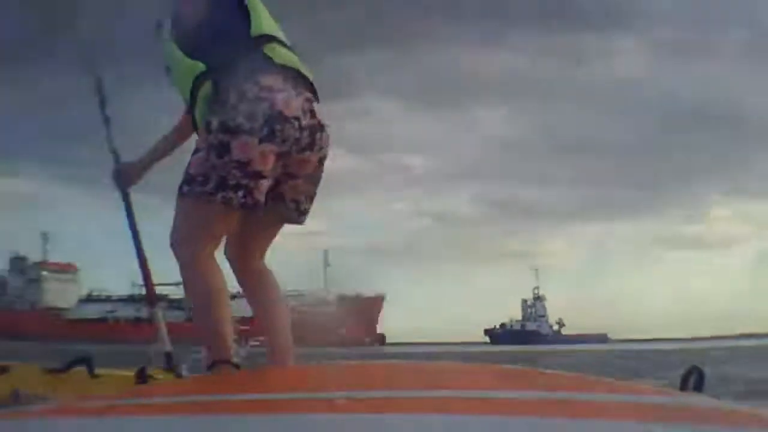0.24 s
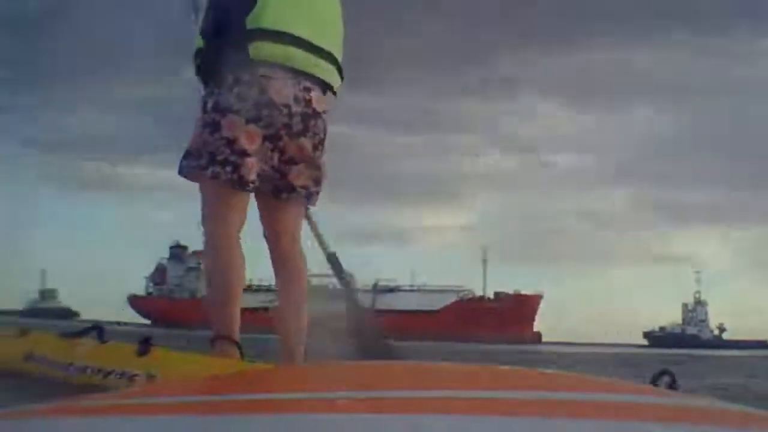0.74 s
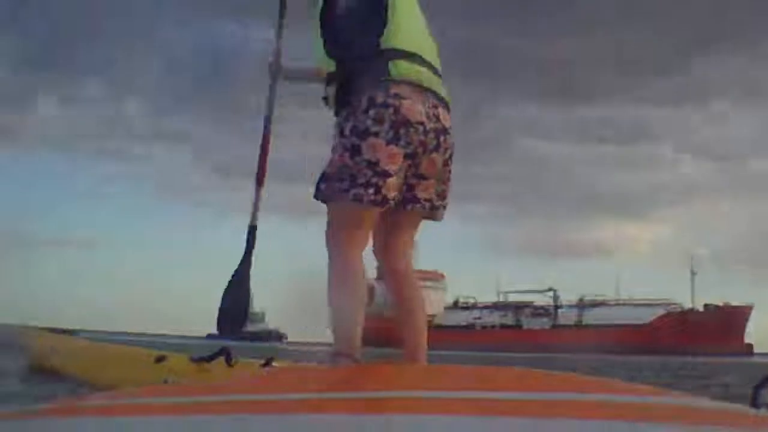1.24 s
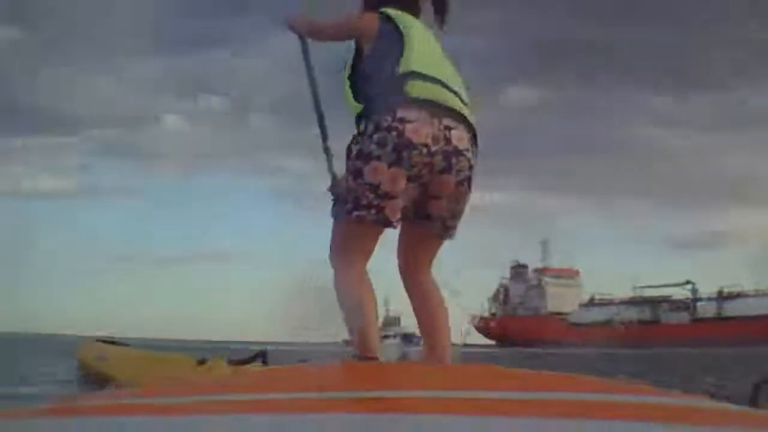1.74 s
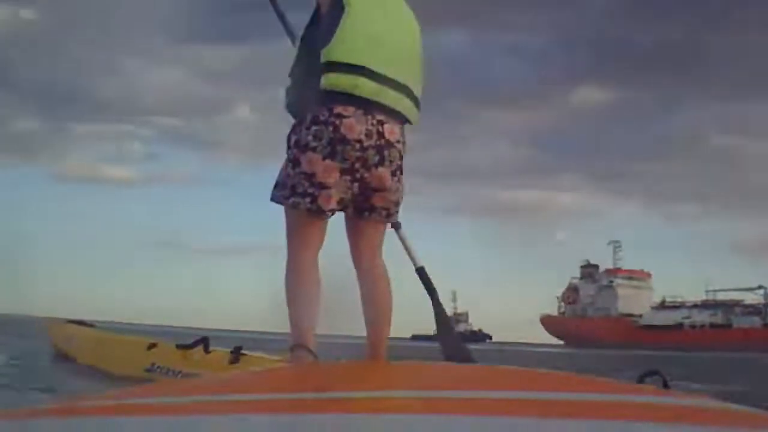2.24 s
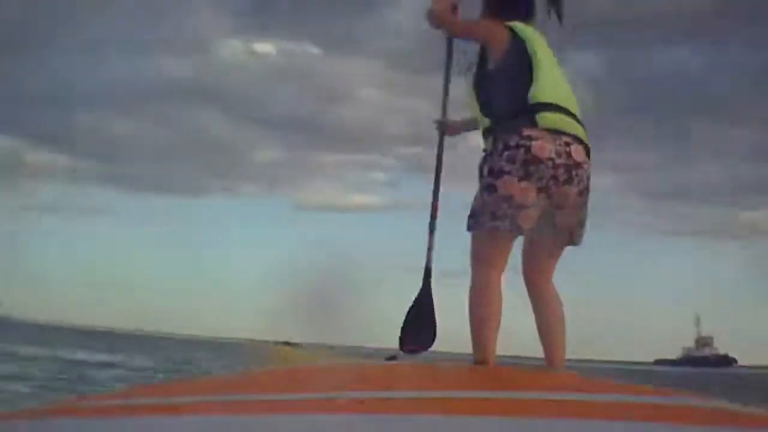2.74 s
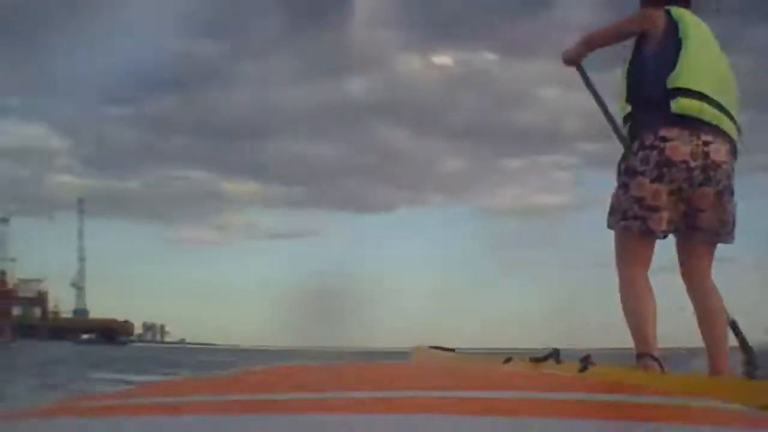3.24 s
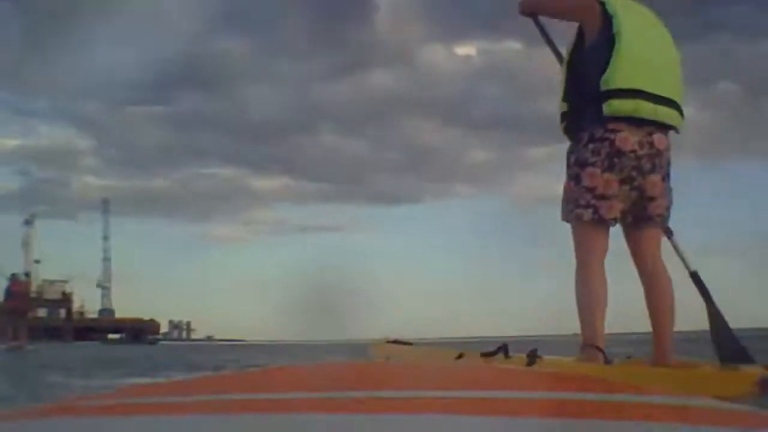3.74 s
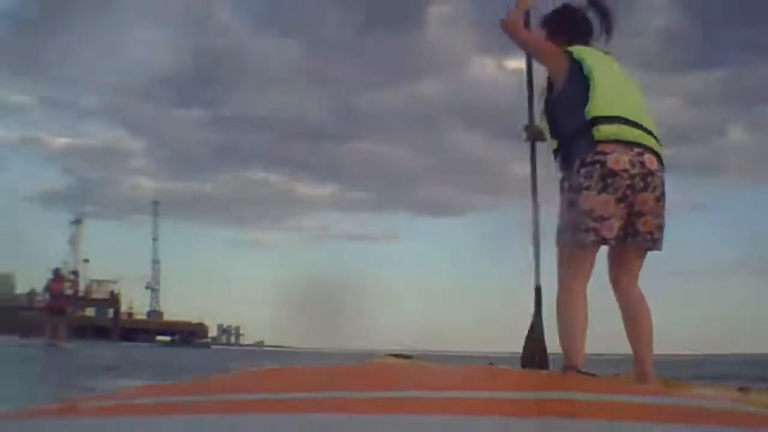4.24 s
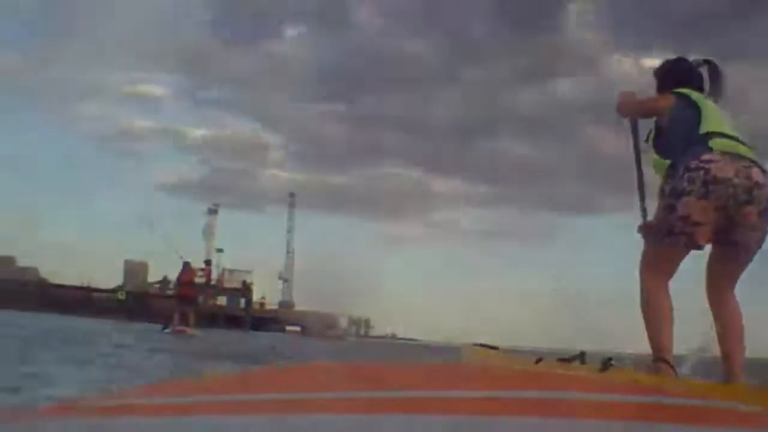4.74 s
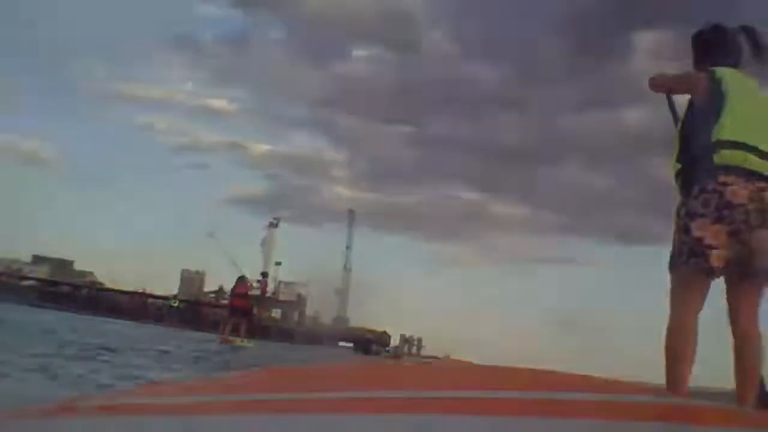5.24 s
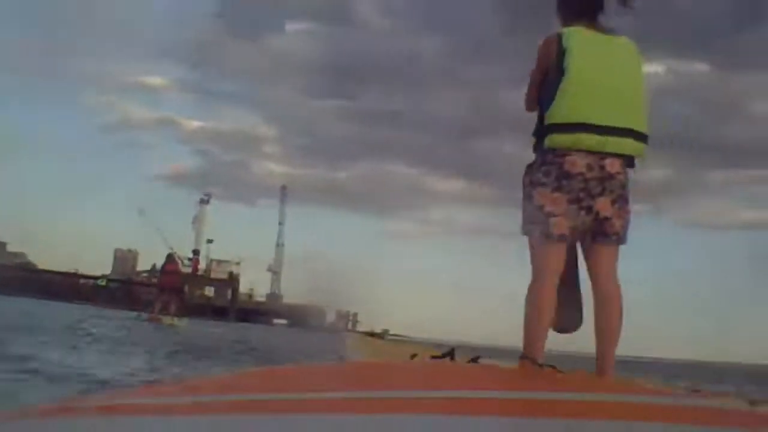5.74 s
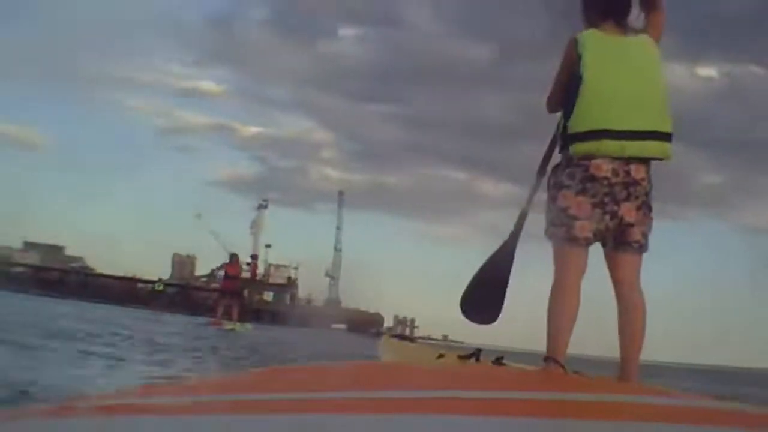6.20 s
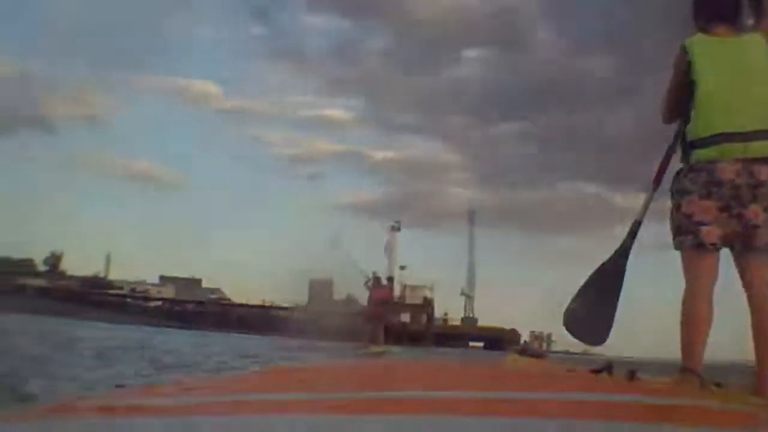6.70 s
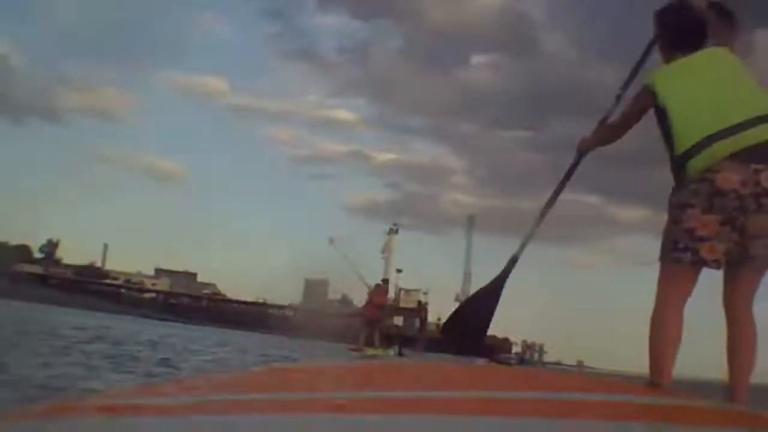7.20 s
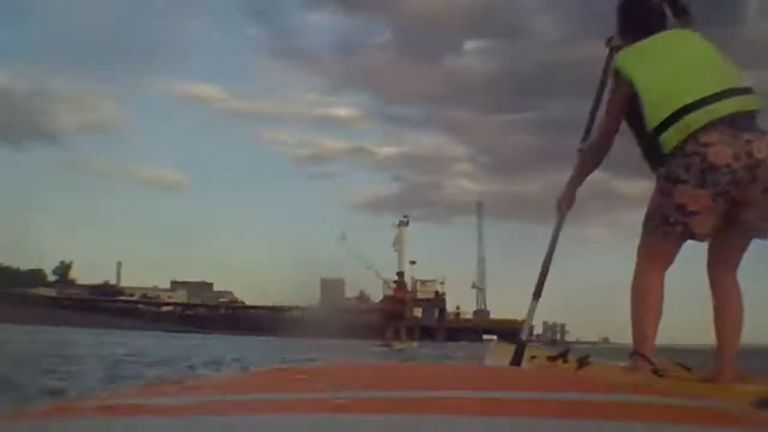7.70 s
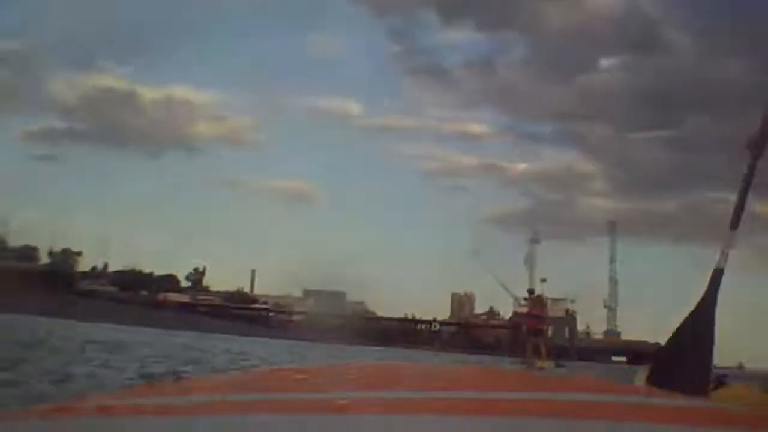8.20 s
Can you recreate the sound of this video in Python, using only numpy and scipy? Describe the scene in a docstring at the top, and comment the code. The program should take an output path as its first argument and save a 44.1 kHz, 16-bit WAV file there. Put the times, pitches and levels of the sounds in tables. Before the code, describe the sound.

A small camera in a plastic housing rides a paddleboard on open water. Wavelets slap and gurgle softly at first over a low, wavering hull rumble, with sparse plastic ticks. Knocks thicken around three and five seconds, then a heavy jolt just after six brings booms, sharp cracks and frantic rattling, overloading the microphone. Rough thumps and clatter continue to the end above faint buzz and hiss.

```python
"""Loose camera on a paddleboard in chop

A small camera in a plastic housing rides on the board, so every source is close and there is no room.
The hull booms as pitched, wavering tones; wavelets slap it as ragged pushes that ring the deck's modes.
The loose camera rattles and scrapes as ticks and slips that ring the housing; bubble tones gurgle, splash, plink.
Underneath, its own electronics buzz, hum and hiss; the microphone's band is narrow and loud jolts overload it."""
import sys
import numpy as np
from scipy import signal
from scipy.fft import rfft, irfft, next_fast_len
from scipy.io import wavfile
from scipy.ndimage import uniform_filter1d

SR = 44100
rng = np.random.default_rng(int(sys.argv[2]) if len(sys.argv) > 2 else 0)


def persist_wave(psi):
    """Save psi, clipped to +-1, as 16-bit WAV."""
    counts = np.round(np.clip(psi, -1, 1) * 32767).astype(np.int16)
    wavfile.write(sys.argv[1], SR, np.atleast_2d(counts).T)


N = 373086  # samples

# ringing modes of the plastic housing: f/Hz, relative level/dB, t60/s
HOUSING_MODES = [(1390, -26, 0.026), (1840, 2, 0.013), (2155, 0.5, 0.0096), (2996, -1, 0.011),
                 (4095, -6.5, 0.014), (4820, -0.5, 0.003), (6520, -24.5, 0.0096), (6830, -23.5, 0.0076)]
# ringing modes of the deck: f/Hz, relative level/dB, t60/s
DECK_MODES = [(90, 7.5, 0.026), (176, -3, 0.11), (238.6, -4, 0.04), (361, -3, 0.031), (450, -3, 0.026),
              (916, 5.5, 0.0058), (1260, 7, 0.014), (1860, -3, 0.019)]
USUAL_BRIGHT_DB = -16.5  # brightness at which a knock leaves the housing's modes untilted


def gain_of(db):
    """Decibels to amplitude."""
    return 10 ** (np.asarray(db) / 20)


def evened(x):
    """Scales to rms 1."""
    return x / np.sqrt(np.mean(x ** 2) + 1e-20)


def read(points, hz):
    """Reads a spectrum on a log-frequency axis."""
    f, value = np.transpose(points)
    return np.interp(np.log(hz + 1), np.log(f + 1), value)


def add(mix, s, sound):
    """Mixes a sound in at time s."""
    part = mix[round(s * SR):][:len(sound)]
    part += sound[:len(part)]


def coloured(x, spectrum):
    """Filters by a spectrum, rms 1."""
    size = next_fast_len(len(x))
    gain = gain_of(read(spectrum, np.fft.rfftfreq(size, 1 / SR)))
    return evened(irfft(rfft(x, size) * gain, size)[:len(x)])


def slow(seconds):
    """Smooth chance of rms 1 that changes over the given time."""
    size = max(int(seconds * SR), 2)
    once = uniform_filter1d(rng.standard_normal(N), size)
    return evened(uniform_filter1d(once, size))


def ring(modes, tilt, blow, detune):
    """A blow rings a table of decaying modes; tilt holds extra dB and detune a pitch factor per mode."""
    t = np.arange(round(.16 * SR)) / SR
    body = np.zeros(len(t))
    for k, ((hz, db, t60), more_db, factor) in enumerate(zip(modes, tilt, detune)):
        decay = gain_of(db + more_db - 60 * t / t60)
        body += (-1) ** k * decay * np.sin(2 * np.pi * hz * factor * t)
    return signal.fftconvolve(blow, body)


def chop(column):
    """How rough the water under the board is: one column of its table at every sample."""
    # t/s, hull flexing level/dB, water heave level/dB, gurgle level/dB
    roughness = [(0.0, -37.5, -51.5, -55.5), (0.3, -28.5, -47, -56), (0.85, -36, -56, -55.5),
                 (1.81, -25, -37, -47), (2.33, -34.5, -53, -59), (2.47, -27.5, -46, -48.5),
                 (2.61, -30, -38, -45.5), (3.53, -17, -29.5, -44), (4.24, -27.5, -40.5, -47.5),
                 (5.42, -19, -34, -41), (5.73, -23, -39, -51.5), (6.05, -30.5, -41.5, -47.5),
                 (6.13, -12.5, -40, -39), (6.22, -20.5, -26.5, -36), (6.46, -11, -44.5, -44),
                 (6.55, -25.5, -43, -43.5), (6.74, -13.5, -36, -47), (7.37, -27.5, -37, -40.5),
                 (7.49, -11, -22.5, -48), (7.82, -25, -47.5, -52), (8.22, -15.5, -33, -41),
                 (8.46, -18, -45, -45.5)]
    rows = np.transpose(roughness)
    return np.interp(np.arange(N) / SR, rows[0], rows[column])


def hull():
    """The board flexes near one low pitch, swelling and fading by chance; water heaves under it in lumps."""
    # spectrum of the heaving water: f/Hz, relative level/dB per Hz
    heave_spectrum = [(8.8, -38), (15, -7.5), (32, -4.5), (48, -7.5), (76, 3), (184, -5), (222, -19.5),
                      (300, -44), (390, -58), (660, -120)]
    swell_db, swell_s = 3, 0.075  # rms and pace of the swelling
    turns = np.cumsum(42 * (1 + 0.0993 * slow(0.0298))) / SR  # wavers around 42 Hz
    uneven = 1 + 0.41 * slow(0.02) + 0.22 * slow(0.0075)
    flex = evened(np.sin(2 * np.pi * turns) * uneven * gain_of(swell_db * slow(swell_s)))
    lumps = gain_of(3.06 * slow(0.021))
    heave = coloured(rng.standard_normal(N) * lumps, heave_spectrum)
    return gain_of(chop(column=1)) * flex + gain_of(chop(column=2)) * heave


def booms():
    """Heavy waves jolt the whole board: each tone rises within milliseconds and rings down, sagging in pitch."""
    # t/s, level before the onset ramp/dB, nominal f/Hz, t60/s
    jolts = [(.99, -20.5, 43.3, 0.5), (1.818, -9, 57.7, 0.31), (2.466, -20, 48, 0.46),
             (2.65, -16.5, 94, 0.12), (3.75, -15, 43.7, 0.19), (6.1001, 1.5, 87, 0.15), (6.74, 0, 54, 0.23),
             (6.95, -10.5, 46.7, 0.27), (7.435, -9, 64, 0.12), (7.994, -3.5, 49.4, 0.64),
             (8.201, -8.5, 46, 0.45)]
    out, t = np.zeros(N), np.arange(round(.4 * SR)) / SR
    for s, db, hz, t60 in jolts:
        turns = hz * t * (0.859 + 0.2 * np.exp(-t / 0.043))
        onset = 1 - np.exp(-t / 0.0028)
        add(out, s, -gain_of(db - 60 * t / t60) * np.sin(2 * np.pi * turns) * onset)
    return out


def cracks():
    """The housing cracks hard on the deck: a sharp blow and its quick repeat ring only the deck's upper modes."""
    # t/s, peak level/dB
    hard_blows = [(6.1144, 2), (6.122, 0), (6.7598, -12.5)]
    out, modes = np.zeros(N), [m for m in DECK_MODES if m[0] > 700]
    blow = np.r_[1, np.zeros(60), .5]  # half as strong after 1.4 ms
    sound = ring(modes, [0, 0, 5], blow, np.ones(len(modes)))
    for s, db in hard_blows:
        add(out, s, gain_of(db) * sound / np.abs(sound).max())
    return out


def slaps():
    """A wavelet lands as a ragged push on the deck's modes; the upper modes feel mostly its first edge."""
    # t/s, peak level of the middle modes/dB, low thump over that/dB, sharp crack over that/dB
    wavelets = [(0.257, -28, -2, 0.5), (0.76, -34, -1, 0), (1.005, -27.5, 0, -11.5),
                (1.071, -32.5, -4, 1.5), (1.317, -26, -0.5, -10), (1.462, -29.5, -1, -4),
                (1.797, -33.5, 20, -22.5), (2.651, -44.5, 21, 11), (2.732, -18, -6, -9),
                (2.887, -20, -1.5, -4), (3.658, -29.5, 14.5, -16), (3.872, -35, 1.5, 1.5),
                (4.059, -28.5, 5, -15), (5.035, -26.5, -10, -21), (5.124, -25.5, -7, -17.5),
                (5.413, -28, -9.5, -3.5), (5.798, -28.5, 0.5, -7), (6.091, -7, 6, -5.5),
                (6.251, -24, 9, -19), (6.736, -18, -5.5, -7), (7.407, -14, -2, -19),
                (7.765, -28.5, -9, -7.5), (7.977, -20.5, 3.5, -3), (8.139, -19, 1, -10),
                (8.321, -29, -12, -3.5)]
    out, t = np.zeros(N), np.arange(round(.06 * SR)) / SR
    chance = rng.standard_normal((len(wavelets), len(t) + len(DECK_MODES)))
    middle = [m for m in DECK_MODES if 200 < m[0] < 700]
    low = [m for m in DECK_MODES if m[0] < 200]
    upper = [m for m in DECK_MODES if m[0] > 700]
    for (s, db, thump_db, crack_db), z in zip(wavelets, chance):
        for modes, more_db, fade_s in (middle, 0, .02), (low, thump_db, .008), (upper, crack_db, .004):
            push = z[:len(t)] ** 3 * np.exp(-t / fade_s) * (1 - np.exp(-t / 0.0012))
            sound = ring(modes, 0 * z, push, 1 + 0.027 * z[len(t):])
            add(out, s - .0015, gain_of(db + more_db) * sound / np.abs(sound).max())
    return out


def knock(out_db, bright_db, u):
    """A tick, a rebound about 3 ms later and a chatter of lesser touches, ringing the housing."""
    high = np.array([hz > 3600 for hz, _, _ in HOUSING_MODES])
    rebound_db = -12.5 + 19 * (u[-1] - .5)  # against the tick
    rebound_db += 0.21 * (out_db + 17)  # harder knocks rebound harder, dB per dB around -17 dB
    place = u[25:-1]  # every knock lands elsewhere, so mode strengths and pitches vary
    tilt = (bright_db - USUAL_BRIGHT_DB) * high + 8 * (place[::-1] - .5)
    detune = 1 + 0.096 * (place - .5)
    blow = np.zeros(1500)
    blow[0] = 1
    size = np.abs(ring(HOUSING_MODES, tilt, blow, detune)).max()  # peak of the tick alone
    after = 0.027 * u[1:13] ** 1.5  # seconds
    chatter = 0.91 * gain_of(rebound_db) * (2 * u[13:25] - 1) * np.exp(-after / 0.0063)
    blow[(10 + after * SR).astype(int)] = chatter
    blow[round((.0024 + .0012 * u[0]) * SR)] = gain_of(rebound_db)
    return gain_of(out_db) * ring(HOUSING_MODES, tilt, blow, detune) / size


def rattles():
    """The camera knocks in its housing: clear knocks, and light touches shortly after some of them."""
    # clear knocks: t/s, peak level of the first tick/dB, brightness/dB
    clear_knocks = [(0.3409, -33, -22), (0.3885, -29.5, -27), (0.8447, -29, -24), (1.1796, -29.5, -23),
                    (1.4728, -29, -13), (1.537, -17.5, -17.5), (1.8238, -18, -20), (1.8824, -30, -20),
                    (2.087, -31, -18), (2.4929, -24, -18), (2.9464, -23.5, -20), (3.0078, -20.5, -18),
                    (3.051, -20.5, -25), (3.0732, -22.5, -21), (3.2399, -20.5, -20), (3.3386, -22, -19),
                    (3.5701, -17.5, -18), (3.5939, -19, -21), (3.8805, -22.5, -14), (3.9155, -23, -23),
                    (3.9399, -22.5, -21), (4.3912, -29, -17), (4.6138, -21.5, -15), (4.6404, -28, -16),
                    (4.6729, -26.5, -10), (4.709, -34, -11), (4.7383, -24.5, -13), (4.787, -28.5, -11),
                    (4.812, -29, -12), (4.85, -32, -12), (4.9087, -28, -23), (5.0255, -26.5, -14),
                    (5.0393, -19, -19), (5.0517, -27, -13), (5.1718, -31, -16), (5.249, -25.5, -17),
                    (5.2767, -25.5, -19), (5.3024, -14.5, -17), (5.3238, -21.5, -18), (5.9259, -22.5, -18),
                    (5.946, -27, -16), (6.1162, -7, -24), (6.1266, -5.5, -13), (6.1332, -10, -23),
                    (6.1584, -6, -13.5), (6.1932, -5, -13.5), (6.2286, -10, -17), (6.2667, -19.5, -12),
                    (6.3355, -16.5, -16), (6.341, -14.5, -17), (6.369, -7.5, -20.5), (6.3836, -9.5, -6),
                    (6.4029, -9.5, -15), (6.4197, -8, -5), (6.4337, -9, -13), (6.4557, -14, -9),
                    (6.4674, -5, -11.5), (6.4905, -24, -14), (6.5079, -12, -17), (6.5379, -21.5, -11),
                    (6.5436, -8.5, -17), (6.575, -10.5, -16.5), (6.6083, -14.5, -16.5), (6.6298, -26, -21),
                    (6.6461, -22.5, -15), (6.6608, -15.5, -9.5), (6.6873, -20, -9), (6.8914, -22, -18),
                    (7.0344, -27, -20), (7.4201, -14, -16), (7.4462, -12, -15.5), (7.4644, -21, -14),
                    (7.4785, -11.5, -15), (7.517, -15, -18.5), (7.5484, -17, -21.5), (7.5813, -18.5, -21),
                    (7.6096, -26, -24), (7.6837, -17, -18), (7.7182, -18, -23), (7.7521, -21.5, -23),
                    (7.7952, -26.5, -29), (8.022, -14, -18), (8.0702, -21, -21), (8.2392, -18, -20),
                    (8.2713, -20.5, -17.5)]
    touches_per_s, touch_within_s = 2, .06
    touch_db, touch_spread_db = -29, 4  # centre and full width of their levels
    out = np.zeros(N)
    chance = rng.random((len(clear_knocks), 26 + len(HOUSING_MODES)))
    for (s, db, bright_db), u in zip(clear_knocks, chance):
        add(out, s, knock(db, bright_db, u))
    touches = rng.random((round(touches_per_s * N / SR), 29 + len(HOUSING_MODES)))
    for pick, lag, size, *u in touches:
        s = clear_knocks[int(pick * len(clear_knocks))][0] + touch_within_s * lag
        add(out, s, knock(touch_db + touch_spread_db * (size - .5), USUAL_BRIGHT_DB, np.array(u)))
    return out


def scrapes():
    """The camera slides in its housing: dense, uneven slips ring the plastic for a moment."""
    # t/s, length/s, rms level over that length/dB
    slides = [(1.85, .045, -40.5), (3.595, 0.062, -46), (4.905, 0.029, -47), (6.093, 0.044, -27),
              (6.263, 0.019, -40), (6.368, 0.031, -32), (6.413, 0.018, -53)]
    out = np.zeros(N)
    for s, length, db in slides:
        u = rng.random((2, 4000))[:, :round(length * SR)]
        slips = (u[0] < 900 / SR) * (2 * u[1] - 1)  # about 900 per second
        sound = ring(HOUSING_MODES, np.zeros(len(HOUSING_MODES)), slips, np.ones(len(HOUSING_MODES)))
        add(out, s, gain_of(db) * sound / np.sqrt(np.sum(sound ** 2) / u.shape[1]))
    return out


def washes():
    """Wavelets wash along the hull: gain in dB for large and small bubbles rises, holds and falls."""
    # start t/s, length/s, large bubbles gain/dB, small bubbles gain/dB
    passing_wavelets = [(0.246, 0.088, 2.5, 4.5), (1.434, 0.12, -2, 2.5), (2.41, .14, 6.5, 6.5),
                        (2.696, 0.099, 5.5, 6), (2.845, 0.046, 8, 1), (3.197, 0.13, 9, 8.5),
                        (3.571, 0.061, 6, -2), (3.81, 0.25, 3.5, 4.5), (4.358, 0.072, -5, 5),
                        (5.415, 0.18, 7, 7), (6.308, 0.056, -2, 3), (6.692, 0.087, 10, 10.5),
                        (7.393, 0.088, 7, 10), (7.977, .2, 4, 9)]
    rise_s, fall_s = 0.014, 0.024
    t, out = np.arange(N) / SR, np.zeros((2, N))
    for s, length, large_db, small_db in passing_wavelets:
        shape = np.interp(t, [s - rise_s, s, s + length, s + length + fall_s], [0, 1, 1, 0])
        out += np.outer([large_db, small_db], shape)
    return out


def water():
    """Bubbles of many sizes, each a short rising tone: large ones gurgle, small ones splash, in clumps."""
    # strength of each bubble size: f/Hz, relative level/dB
    bubble_sizes = [(150, -1.5), (300, 5.5), (480, 2.5), (620, -14), (900, -10.5), (1250, -8.5),
                    (1600, -17), (2200, -21.5)]
    calm_db, splash_follows = -56, 0.5  # splash rises by this share of each dB of gurgle
    gurgle, splash = layers = np.zeros((2, N))
    for hz in np.geomspace(150, 2200, num=28):
        turns = np.arange(round(8 * SR / hz)) * hz / SR
        envelope = np.exp(-turns / 2.2) * (1 - np.exp(-turns / 1.5))
        bubble = np.sin(2 * np.pi * turns * (1 + 0.012 * turns)) * envelope
        strength = gain_of(2.6 * np.minimum(rng.exponential(1, N), 4))
        births = strength * (rng.random(N) < .2 * hz / SR)  # smaller bubbles are born more often
        layers[int(hz > 620)] += gain_of(read(bubble_sizes, hz)) * signal.oaconvolve(births, bubble)[:N]
    clumps = gain_of(3.13 * slow(0.019))
    gurgle_db, (large_db, small_db) = chop(column=3), washes()
    splash_db = calm_db + splash_follows * (gurgle_db - calm_db)
    large = gain_of(gurgle_db + large_db) * evened(gurgle * clumps)
    small = gain_of(splash_db + small_db) * evened(splash * clumps)
    return large + small


def plops():
    """A small lone bubble or droplet plinks briefly, rising a little in pitch."""
    # t/s, level before the envelope/dB, nominal f/Hz
    lone_plinks = [(0.276, -37, 1980), (0.408, -30.5, 1450), (0.817, -35, 1090), (1.274, -37.5, 1080),
                   (1.334, -35, 840), (3.815, -30, 990), (4.653, -33, 1320), (4.689, -35, 970),
                   (5.147, -26.5, 920), (5.2, -28.5, 1010)]
    out, t = np.zeros(N), np.arange(round(.04 * SR)) / SR
    envelope = np.exp(-t / 0.0044) * (1 - np.exp(-t / 0.00043))
    for s, db, hz in lone_plinks:
        tone = np.sin(2 * np.pi * hz * t * (0.974 + 1.1 * t))
        add(out, s, gain_of(db) * tone * envelope)
    return out


def electronics():
    """Clock spikes leak in bursts over a hiss; a hum switches on and off about 12.5 times a second over a whine."""
    # hiss spectrum: f/Hz, relative level/dB per Hz
    hiss_spectrum = [(200, -34), (300, -4), (480, -7), (600, -9), (800, -17.5), (1500, -6), (2180, -6),
                     (2510, -13.5), (2900, -7.5), (4500, -14), (5850, -9.5), (7600, -12.5), (8400, -41.5)]
    # filter on the clock spikes: f/Hz, relative level/dB
    spike_spectrum = [(300, -14), (1400, 2), (2200, 0.5), (3600, -19), (4300, -13), (5700, -5.5),
                      (7300, -4)]
    clock_hz, burst_hz, switching_hz, hum_hz, whine_hz = 723.6, 79.93, 12.49, 474.6, 699.7
    t = np.arange(N) / SR
    since = ((t + .0031) * burst_hz % 1) / burst_hz  # seconds into the burst cycle
    gate = np.exp(-(since / 0.0043) ** 2) + 0.093
    off = (t * clock_hz + 7 * since + .5) % 1 - .5  # the spikes run a little fast within a burst
    tick = np.sinc(off * SR / clock_hz / 3.29)
    tick *= abs(off) < .1
    chance = gain_of(3 * rng.standard_normal(int(N * clock_hz / SR) + 2))
    sizes = chance[np.round(t * clock_hz).astype(int)]
    buzz = coloured(np.gradient(tick * sizes * gate), spike_spectrum)
    cycle = t * switching_hz
    # the hiss drops briefly twice per switching cycle
    dips = 1 - 0.46 * np.exp(-(((2 * cycle - .25) % 1 - .5) / 0.18) ** 2)
    hiss = coloured(rng.standard_normal(N) * (1 + 1.1 * gate), hiss_spectrum) * dips
    on = uniform_filter1d(1. * ((cycle + .03) % 1 < .38), size=150)
    hum = gain_of(-50) * on * np.sin(2 * np.pi * hum_hz * t)
    whine = gain_of(-62.0) * np.sin(2 * np.pi * whine_hz * t)
    return gain_of(-54.5) * buzz + gain_of(-50.5) * hiss + hum + whine


def scene():
    """All sources reach the microphone through the housing, with no room."""
    board = hull() + booms() + cracks()
    sea = water() + plops() + slaps()
    return (board + sea + rattles() + scrapes() + electronics())[None]


def record(dry):
    """The camera's narrow band, overload at full scale with a small offset, then the band limit."""
    camera_hz, edge_hz, offset = 7838, 16500, -.0097
    camera_band = signal.firwin(121, camera_hz, window=("kaiser", 9), fs=SR)
    narrow = signal.oaconvolve(dry, camera_band[None], "same")
    overloaded = np.clip(narrow + offset, -1, 1)
    band_limit = signal.firwin(511, edge_hz, window=("kaiser", 9), fs=SR)
    return signal.oaconvolve(overloaded, band_limit[None], "same")


dry = scene()
out = record(dry)
persist_wave(out)
```